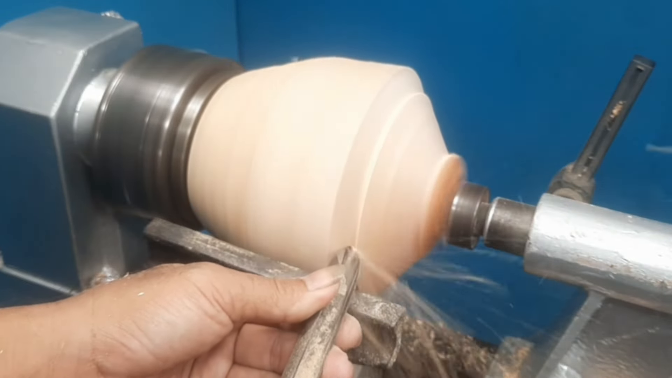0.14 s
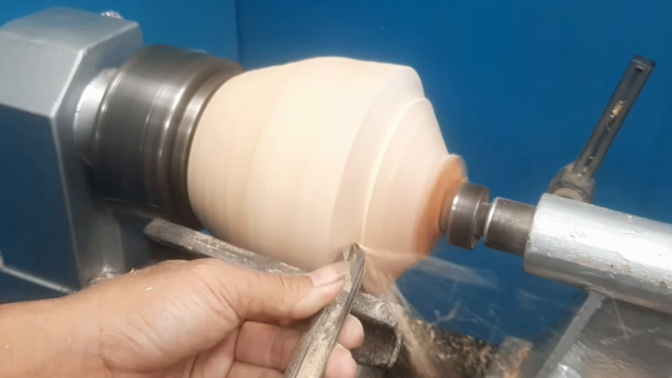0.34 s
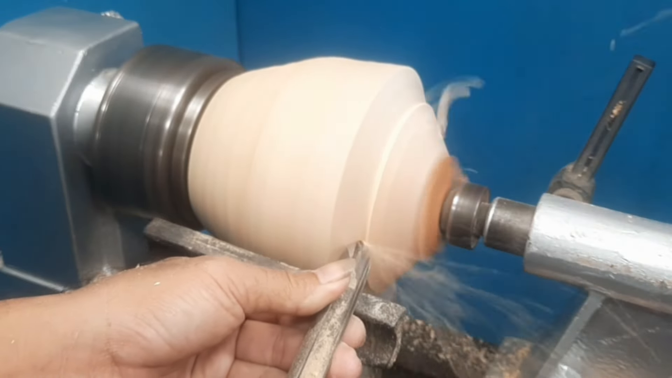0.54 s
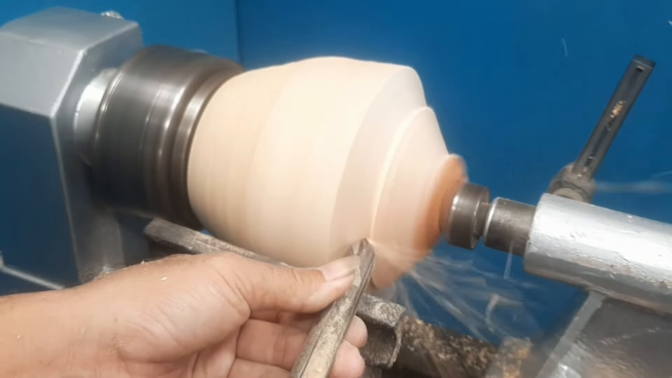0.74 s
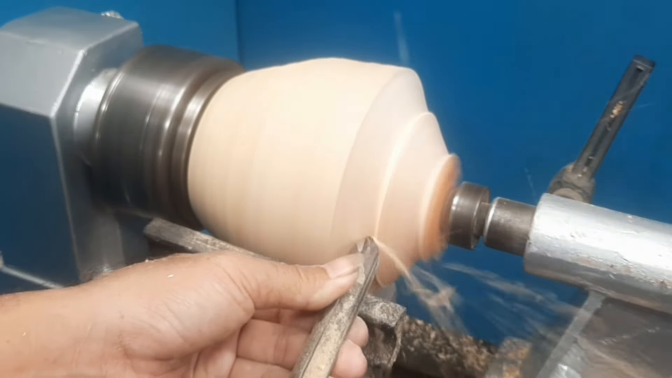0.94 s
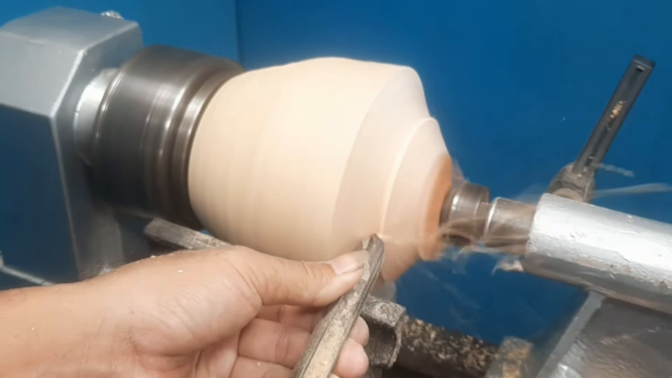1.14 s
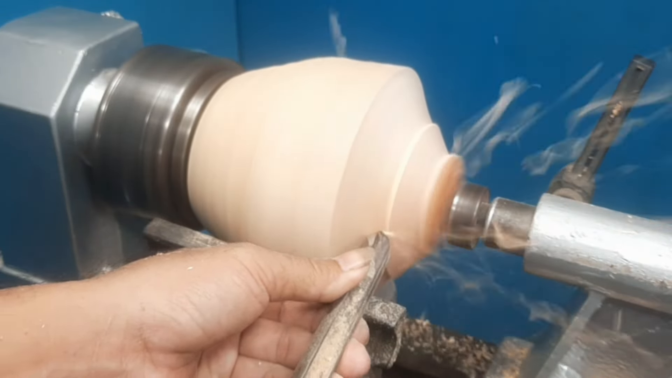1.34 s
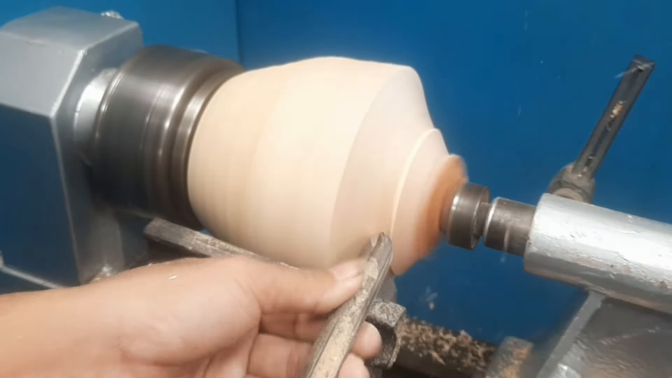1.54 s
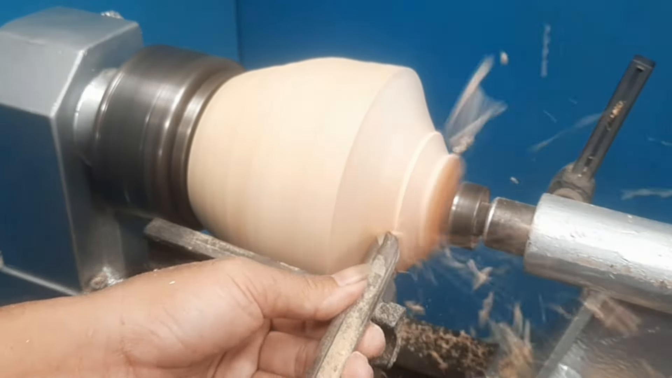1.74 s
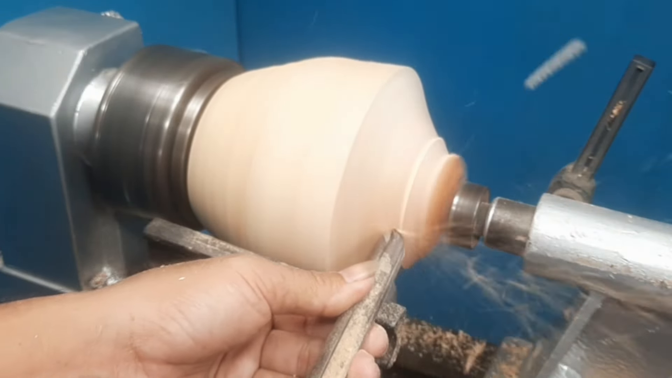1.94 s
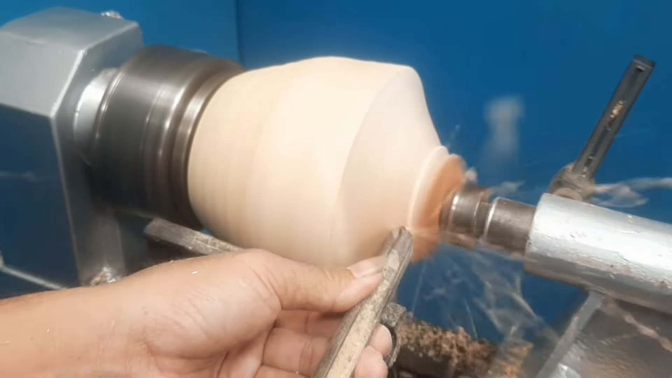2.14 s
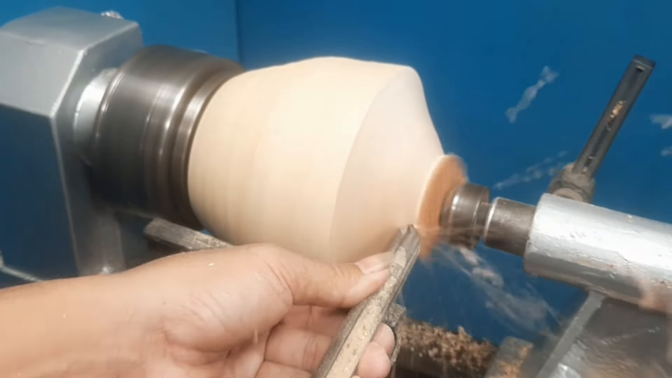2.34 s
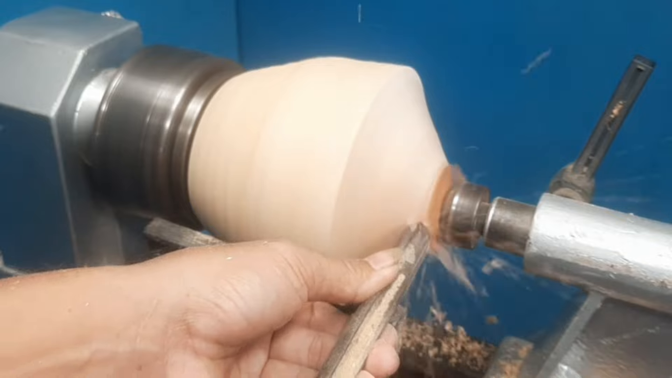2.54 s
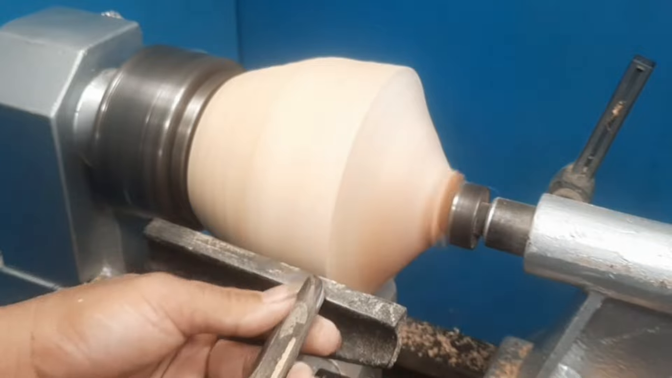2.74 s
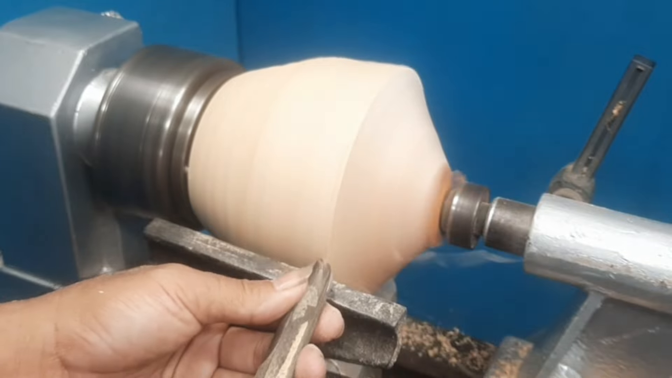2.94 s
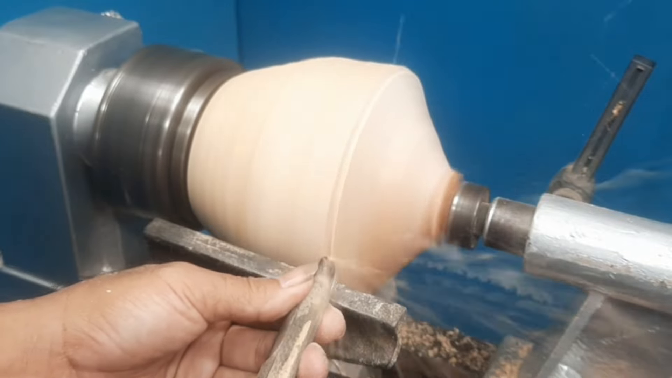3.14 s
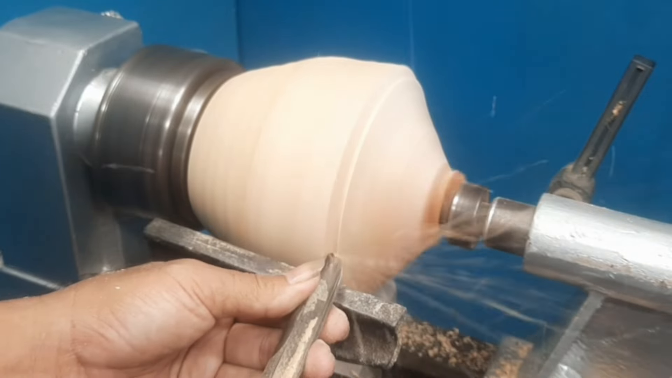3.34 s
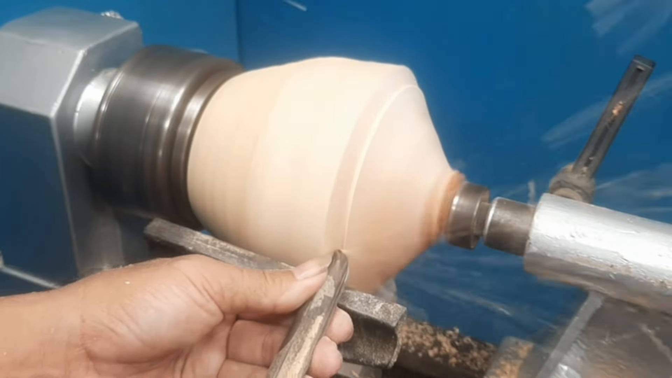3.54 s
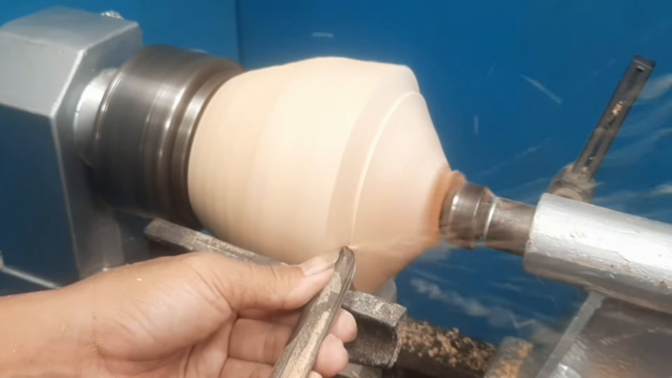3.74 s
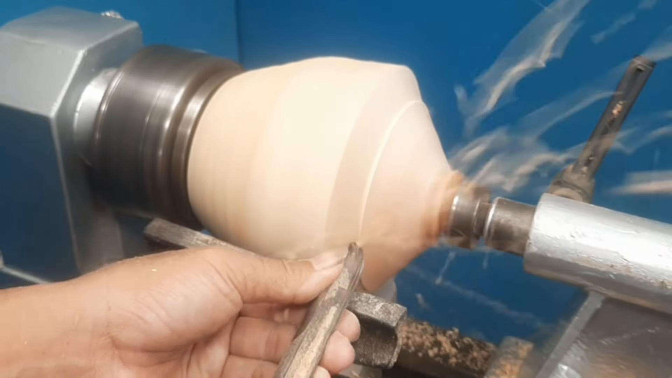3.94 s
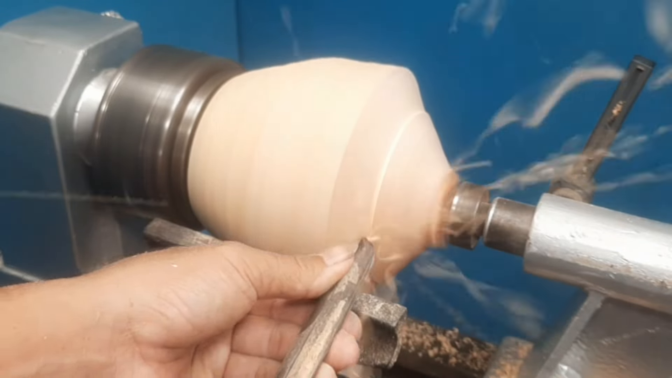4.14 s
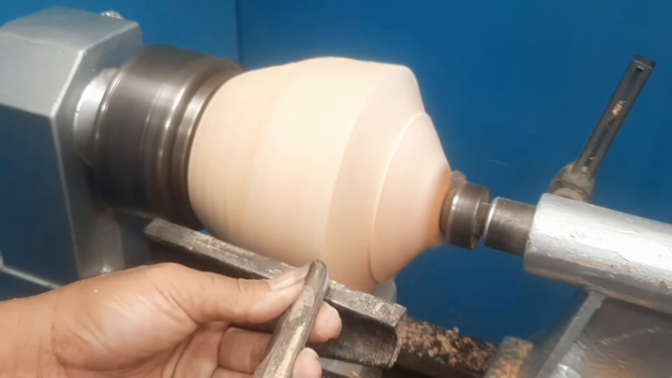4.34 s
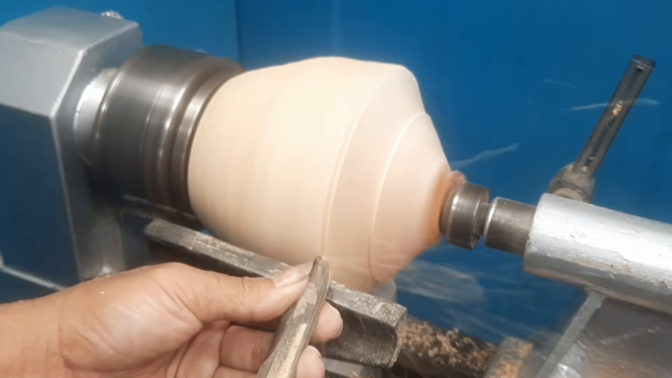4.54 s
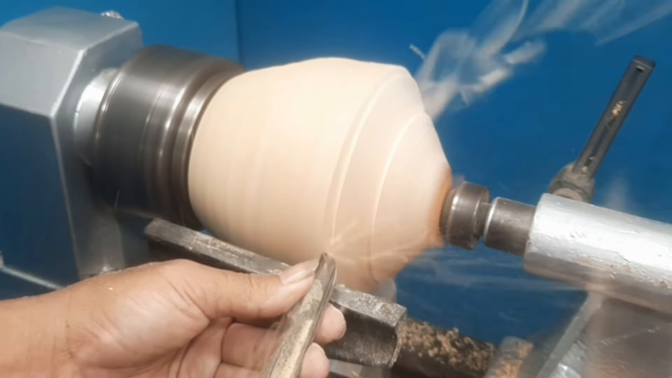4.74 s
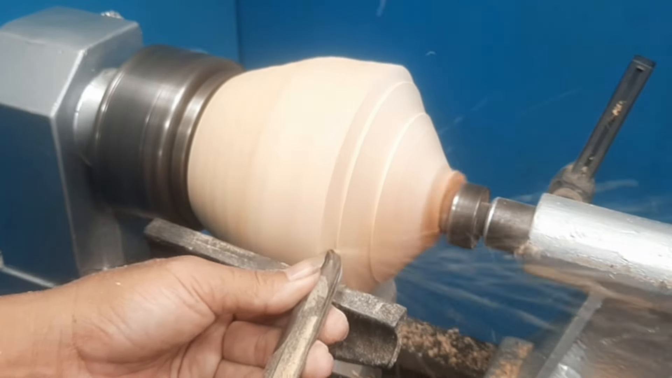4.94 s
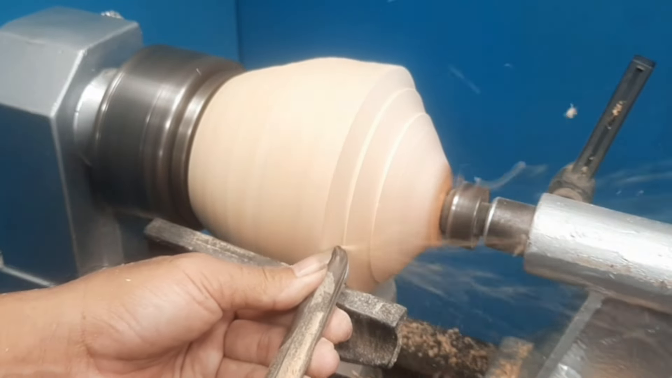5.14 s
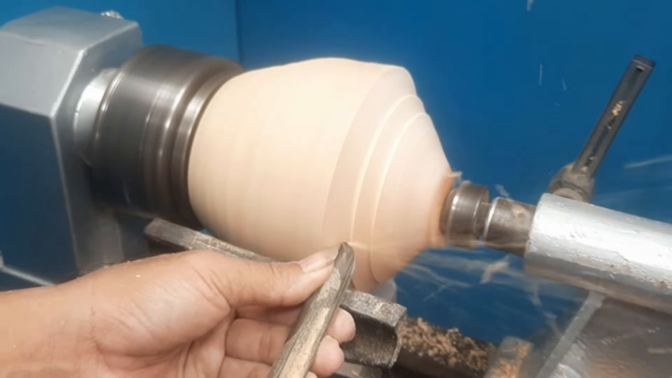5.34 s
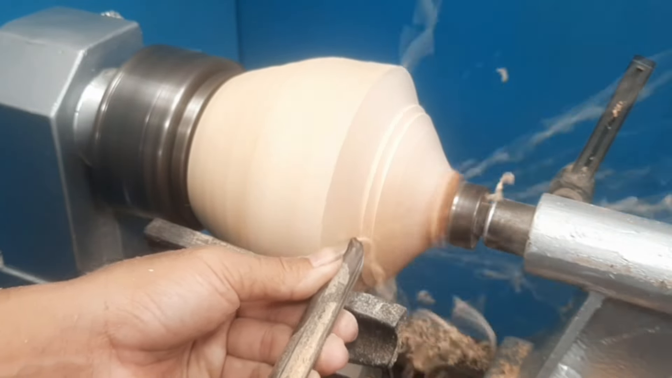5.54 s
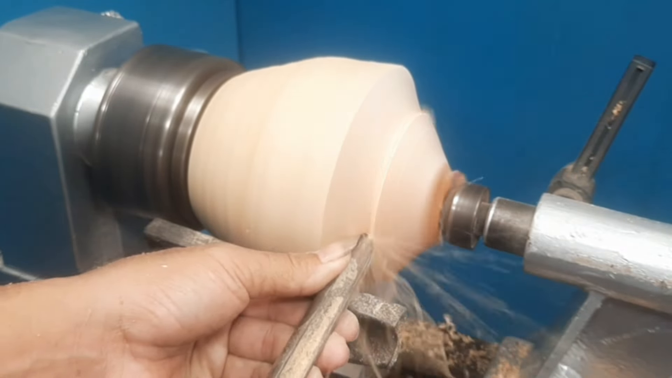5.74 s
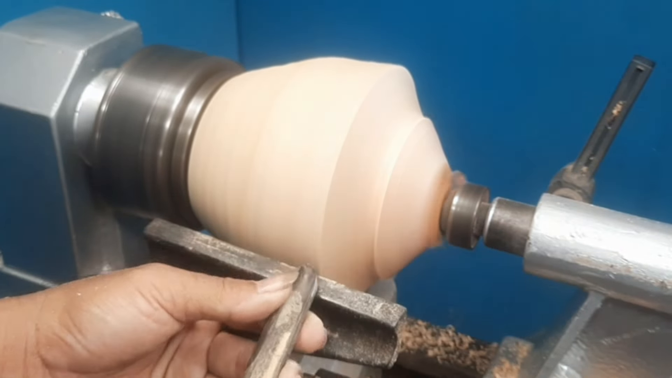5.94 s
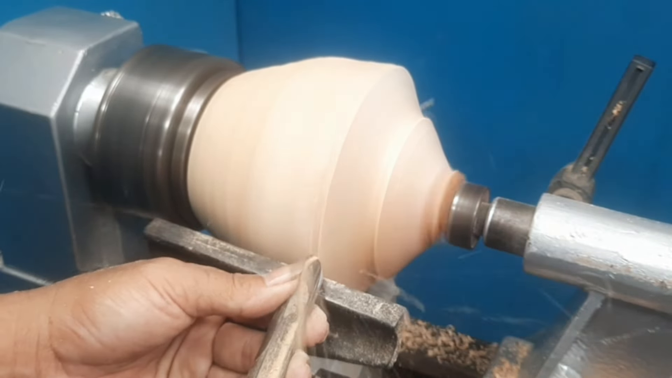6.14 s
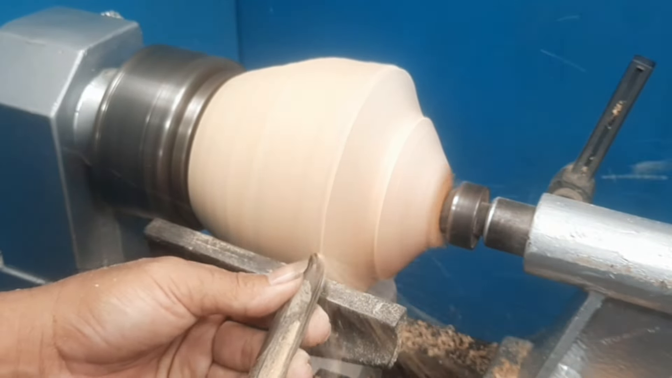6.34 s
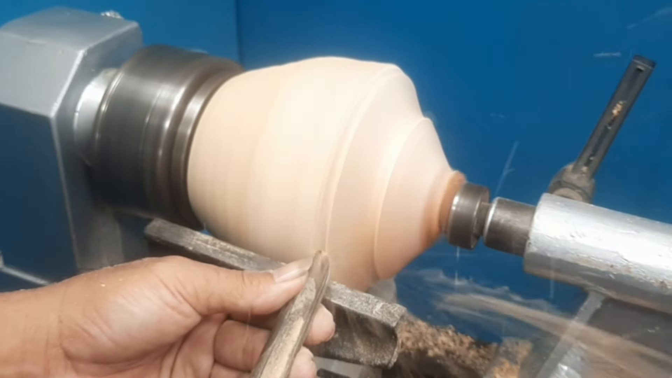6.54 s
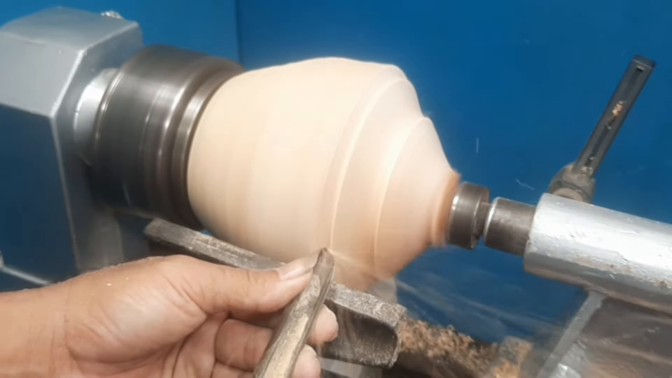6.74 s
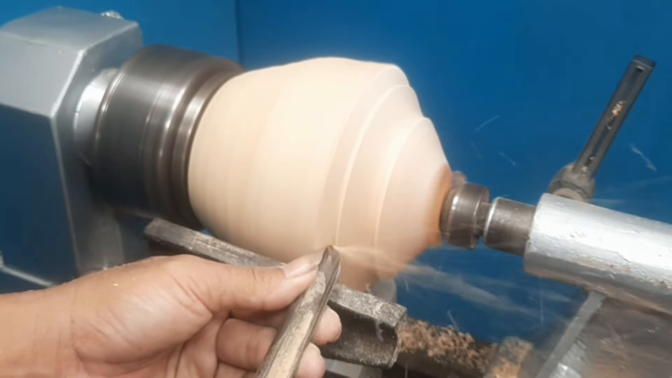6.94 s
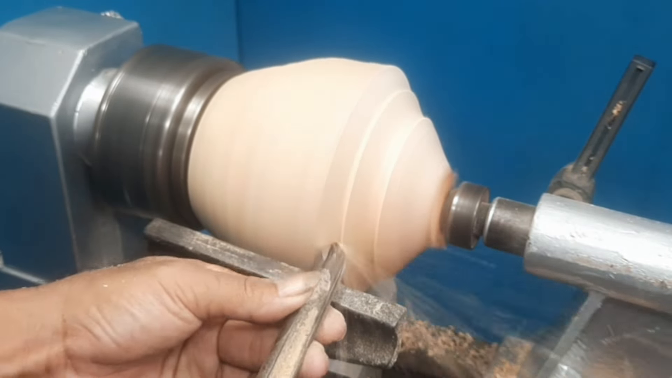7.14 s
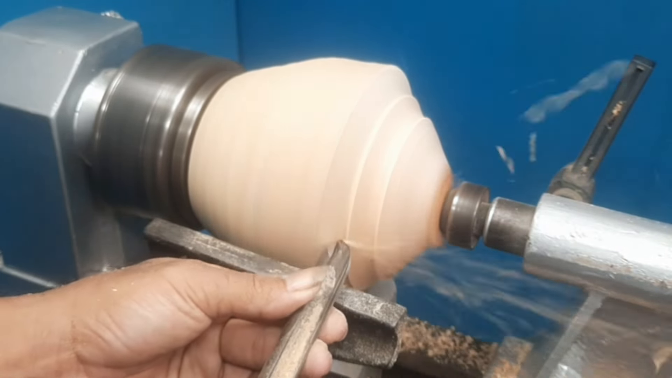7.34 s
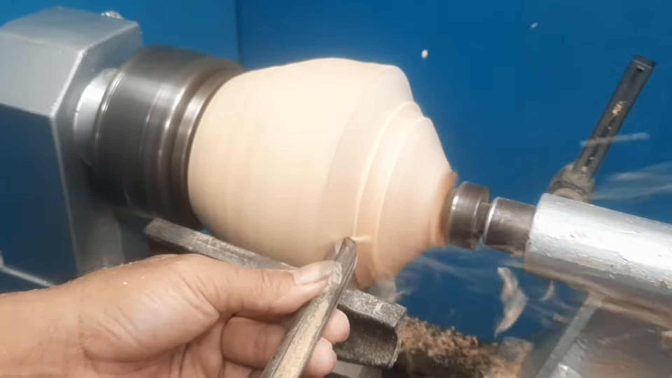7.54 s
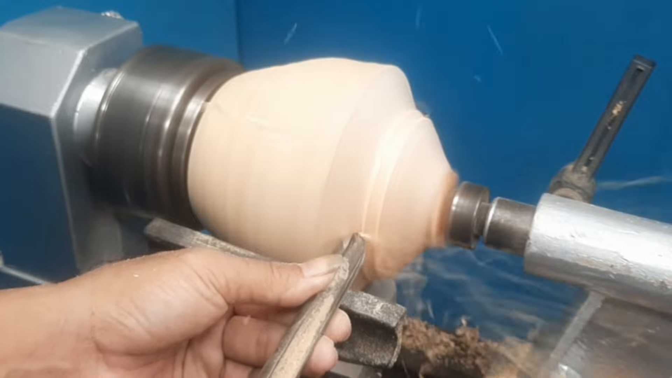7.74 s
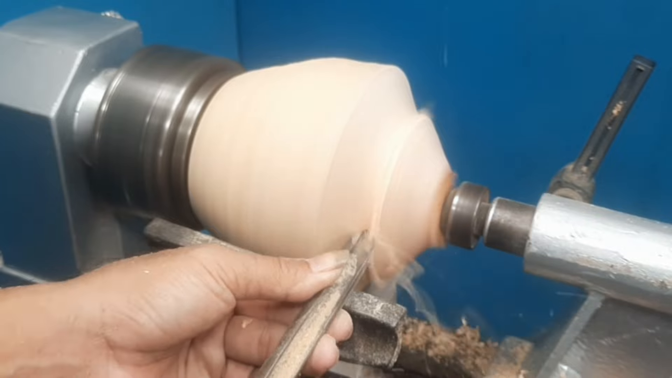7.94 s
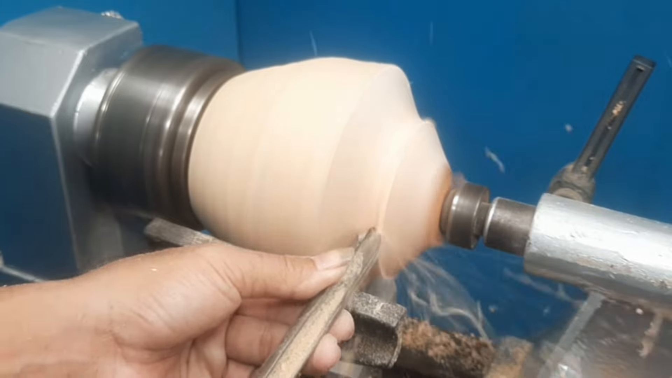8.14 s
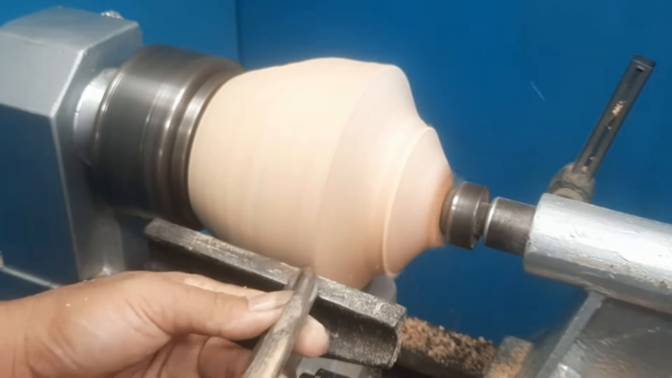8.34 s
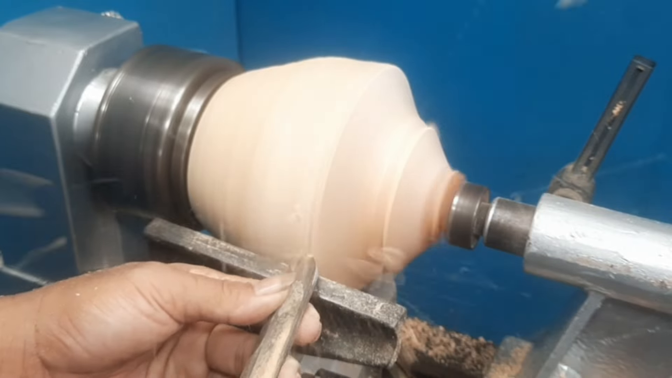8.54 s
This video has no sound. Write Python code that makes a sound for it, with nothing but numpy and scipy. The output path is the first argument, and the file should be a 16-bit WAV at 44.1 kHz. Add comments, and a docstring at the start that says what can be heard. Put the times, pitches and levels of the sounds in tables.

```python
"""At a wood lathe: a hand-held gouge takes five passes, and starts a sixth, over a spinning blank,
close to a two-port microphone. The edge tears fibres (hiss in the tool's high modes) and shakes
blank, tool, rest and headstock, each ringing in its own band (filtered noise). Between passes only
skips, ticks, a faint hover hiss, the lathe (rumbling and stirring the parts) and low puffs remain."""
import sys
import numpy as np
from scipy import signal
from scipy.fft import rfft, irfft, next_fast_len
from scipy.io import wavfile
from scipy.ndimage import uniform_filter1d

SR = 44100
rng = np.random.default_rng(int(sys.argv[2]) if len(sys.argv) > 2 else 0)


def int16_out(signal):
    """Quantize to a 16-bit WAV file."""
    q = np.round(np.clip(np.atleast_2d(signal).T, -1, 1) * 32767)
    wavfile.write(sys.argv[1], SR, q.astype(np.int16))


N = 383229
T = np.arange(N) / SR
M = next_fast_len(N)
HZ = np.fft.rfftfreq(M, 1 / SR)


def gain_of(db):
    """Turn decibels into an amplitude factor."""
    return 10 ** (np.asarray(db) / 20)


def evened(x):
    """Bring each channel to an RMS of one."""
    return x / np.sqrt(np.mean(x ** 2, -1, keepdims=True) + 1e-20)


def read(points, hz):
    """Read a curve of (frequency, value) along a logarithmic frequency axis."""
    f, value = np.transpose(points)
    return np.interp(np.log(hz + 1), np.log(f + 1), value)


def coloured(x, db):
    """Filter by a spectrum in dB, then even the level."""
    return evened(irfft(rfft(x, M) * gain_of(db), M)[:, :N])


def flutter(seconds):
    """Smooth chance that changes about once in the given time."""
    size = max(round(seconds * SR), 1)
    once = uniform_filter1d(rng.standard_normal(N), size)
    return evened(uniform_filter1d(once, size))


def drifting(x, patchy_db, hz, seconds):
    """The colour wanders in patches of time and frequency as the edge moves and turns."""
    z = signal.stft(x, nperseg=512)[2]
    bins, frames = round(hz * 512 / SR), round(seconds * SR / 256)
    patches = rng.standard_normal(z.shape[1:])
    for _ in range(2):
        patches = uniform_filter1d(patches, bins, axis=0)
        patches = uniform_filter1d(patches, frames, axis=1)
    patched = z * gain_of(patchy_db * patches / patches.std())
    return evened(signal.istft(patched, nperseg=512)[1][:, :N])


def slid(spectrum, shift_hz):
    """Back to time with every frequency moved by a curve in Hz."""
    turning = np.exp(2j * np.pi * np.cumsum(shift_hz) / SR)
    return (np.fft.ifft(spectrum, M)[:, :N] * turning).real


# colour of the running lathe: (frequency [Hz], relative level per Hz [dB])
LATHE_COLOUR = [(15, -4), (40, -5.5), (105, 2), (200, -6), (500, -15.5), (750, 1.5), (950, -11), (1150, -6),
                (1600, -9.5), (2100, -13), (3500, -19.5), (6000, -27), (12000, -30), (22000, -61)]
LATHE_DB = -33  # mid level at the source; it wavers


def lathe():
    """Motor, belt and bearings rumble without a break: coloured noise with a wavering level."""
    rumble = coloured(rng.standard_normal((2, N)), read(LATHE_COLOUR, HZ))
    return gain_of(LATHE_DB + 1.3 * flutter(0.03)) * rumble


# louder thumps of thrown air and shavings: (time [s], level before the port balance [dB], pitch [Hz])
LOUD_PUFFS = [(0.925, -21, 141), (1.056, -22, 170), (1.67, -15, 100), (1.973, -21, 300), (2.363, -22, 99.6),
              (2.471, -12, 248), (2.508, -9, 230), (2.524, -14, 220), (2.552, -14, 240), (2.569, -10, 224),
              (2.653, -14, 252), (2.787, -26, 110), (3.038, -24, 102), (3.579, -28, 90), (4.538, -20, 116),
              (4.6, -21, 150), (4.635, -21, 104), (4.758, -18, 180), (4.989, -24, 95), (5.221, -25, 128),
              (5.464, -22, 131), (5.664, -27, 90), (5.734, -21, 124), (5.985, -21, 91), (6.12, -14, 116),
              (6.217, -26, 156), (6.344, -21, 118), (6.476, -22, 131), (6.722, -26, 102), (7.17, -22, 126),
              (7.433, -18, 177), (8.057, -23, 120), (8.13, -16, 233), (8.295, -32, 85), (8.546, -21, 95),
              (8.569, -21, 110), (8.598, -23, 128), (8.654, -23, 109)]
SMALL_PUFFS = 60  # scattered at random
SMALL_DB, SMALL_SPREAD_DB = -35, 2.5  # mid level before the port balance, and its spread
SMALL_HZ, SMALL_SPREAD = 120, 0.16  # mid pitch, and its spread in natural-log units


def puffs():
    """A thump is a low swing of about two cycles, stronger left; its shape differs more the lower it is."""
    out = np.zeros((2, N + SR))
    t = np.arange(0, .06, 1 / SR) - .018  # the swing builds before its crest
    size, pitch = rng.standard_normal((SMALL_PUFFS, 2)).T
    small_db = SMALL_DB + SMALL_SPREAD_DB * size
    small_hz = SMALL_HZ * np.exp(SMALL_SPREAD * pitch)
    small = zip(rng.uniform(0, N / SR, SMALL_PUFFS), small_db, small_hz)
    for at, level_db, hz in LOUD_PUFFS + list(small):
        phase = rng.random()
        right_turn = rng.normal(0, 0.61) * min(100 / hz, 1) ** 2  # in cycles
        swing = np.cos(2 * np.pi * (hz * t + phase + np.array([[0], [right_turn]])))
        fall_cycles = rng.uniform(0.52, 0.72)
        swell = np.exp(-abs(t * hz / np.where(t < 0, .6, fall_cycles)))
        out[:, round(at * SR):][:, :len(t)] += gain_of(level_db) * swing * swell
    return out[:, :N] * gain_of([[3.5], [-3]])


# marked catches and brief slackenings of the edge in the grain:
# (time [s], change of the shaking [dB], negative is a drop)
GRAIN_CHANGES = [(0.381, 5), (0.398, 7), (0.453, 7), (0.49, 7), (0.522, 8), (0.594, 8), (0.697, -5),
                 (0.776, 8), (0.79, 12.5), (0.843, 5), (0.925, 1), (1.169, 11), (1.22, 9.5), (1.26, 10),
                 (1.313, 0), (1.359, 14), (1.363, 8), (1.495, 5), (1.524, 8.5), (1.562, -1), (1.748, 7),
                 (1.801, 10), (1.833, 11), (1.887, -3), (1.998, -2), (2.062, 5), (2.239, 12.5), (2.352, -2),
                 (2.415, 6), (3.55, -5), (3.624, 6), (3.904, 9), (4.027, 8), (4.107, 5), (4.175, -7),
                 (4.925, -1), (5.063, 1), (5.361, 5), (5.54, 4), (5.593, 4), (5.615, 2), (5.64, -3),
                 (5.732, 1), (6.477, 11), (7.06, 9), (7.315, 5), (7.573, 9), (7.694, 8.5), (7.712, 6),
                 (7.773, 8), (7.813, 1), (7.938, 9), (8.148, 5), (8.217, 4), (8.232, 12), (8.268, 13),
                 (8.32, 1)]
CHANGE_RISE_S, CHANGE_FALL_S = 0.0011, 0.0019  # from 1/e to the peak, and back
SMALL_CATCHES, SMALL_CATCH_DB = 420, 2.06  # count; exponential scale of their jolt, capped at twice it


def grip_changes():
    """The edge catches or slackens in the grain: brief rises and drops in dB, plus many small random rises."""
    small_at = rng.uniform(.02, N / SR - .02, SMALL_CATCHES)
    small_db = SMALL_CATCH_DB * np.minimum(rng.exponential(1, SMALL_CATCHES), 2)
    at, size = np.r_[GRAIN_CHANGES, np.c_[small_at, small_db]].T
    db = np.zeros(N)
    np.add.at(db, np.round(at * SR).astype(int), size)
    t = np.arange(-400, 401) / SR
    shape = np.exp(-(t / np.where(t < 0, CHANGE_RISE_S, CHANGE_FALL_S)) ** 2)
    return signal.oaconvolve(db, shape, "same")


# one curve per pass, from touch to lift: (time [s], scrape level [dB], depth of cut [0-1],
# lean of the ringing to the gouge's upper bands [0-1], headstock hum [dB], extra squeal [dB])
PASS_CURVES = [
    [(0.0, -23.5, 0.42, 0.52, -30, 2), (0.11, -24, 0.45, 0.68, -27.5, -5), (0.2, -26, 0.55, 0.65, -23, -5),
     (0.3, -23, 0.44, 0.69, -36, -5), (0.39, -21.5, 0.47, 0.62, -20.5, 0),
     (0.49, -23.5, 0.57, 0.67, -25, -6), (0.65, -25, 0.6, 0.74, -33.5, -1),
     (0.85, -24.5, 0.71, 0.68, -29, -4), (0.95, -24.5, 0.74, 0.57, -32.5, -1.5),
     (1.11, -24, 0.72, 0.58, -32.5, 3), (1.27, -25, 0.85, 0.54, -29, -1),
     (1.33, -25.5, 0.88, 0.61, -31.5, 1), (1.53, -25, 0.82, 0.63, -39, 4), (1.585, -26, 0.81, 0.6, -33, 4)],
    [(1.705, -28, 0.84, 0.47, -43, 4), (1.76, -22.5, 0.67, 0.5, -45, 6), (1.8, -22.5, 0.72, 0.56, -42, 3),
     (1.94, -23.5, 0.71, 0.46, -37, 6.5), (2.16, -23, 0.85, 0.51, -33.5, 4.5),
     (2.36, -17.5, 0.88, 0.38, -30, 2), (2.4, -22.5, 0.85, 0.36, -33, 8.5),
     (2.46, -19.5, 0.71, 0.1, -24, 2.5), (2.55, -25.5, 0.75, 0.0, -33, 3), (2.64, -27, 0.88, 0.1, -24.5, 3),
     (2.68, -27, 0.89, 0.1, -27, -4.5), (2.722, -40, 0.74, 0.0, -30, 2)],
    [(3.017, -16.5, 0.0, 0.15, -35, 6), (3.06, -20.5, 0.12, 0.1, -40, 6), (3.12, -21, 0.34, 0.13, -35, -1),
     (3.24, -17.5, 0.2, 0.24, -27.5, 4), (3.3, -20.5, 0.2, 0.2, -27.5, 3),
     (3.45, -17, 0.18, 0.28, -25.5, 5), (3.62, -21.5, 0.13, 0.56, -35, 8.5),
     (3.72, -22, 0.06, 0.55, -26, 8.5), (3.8, -21, 0.18, 0.66, -36, 4), (3.95, -21.5, 0.23, 0.78, -42, 4),
     (4.11, -25, 0.42, 0.92, -43, 4.5), (4.22, -24, 0.52, 0.83, -40, 7), (4.255, -23.5, 0.57, 0.7, -37, 2)],
    [(4.473, -22.5, 0.01, 0.33, -53, -2), (4.58, -18, 0.08, 0.3, -41, 4),
     (4.68, -17.5, 0.1, 0.33, -27.5, 7), (4.9, -19, 0.19, 0.44, -28, 6.5), (5.1, -20, 0.35, 0.56, -25, 1.5),
     (5.36, -23.0, 0.41, 0.74, -31, 1.5), (5.54, -22, 0.53, 0.78, -29, 5), (5.6, -23.5, 0.57, 0.83, -30, 3),
     (5.66, -25, 0.79, 0.8, -35, -1), (5.76, -23.5, 0.72, 0.62, -21.5, -4), (5.84, -23, 0.9, 0.51, -37, -6),
     (5.92, -28, 0.89, 0.53, -37, 10)],
    [(6.168, -20, 0.0, 0.2, -51, -7), (6.19, -20, 0.0, 0.07, -50, -4.5), (6.24, -22.5, 0.3, 0, -30.5, -9),
     (6.3, -21.5, 0.2, 0.12, -38, -4), (6.42, -19.5, 0.18, 0.34, -26.5, 3.5),
     (6.65, -18.5, 0.2, 0.37, -29.5, 2), (6.92, -21, 0.35, 0.54, -25.5, -5),
     (7.06, -21, 0.44, 0.56, -26.5, -9), (7.12, -23, 0.3, 0.59, -25.5, 4.0),
     (7.26, -23, 0.42, 0.57, -33, -3), (7.4, -22.5, 0.48, 0.68, -32, 2.5),
     (7.54, -22.5, 0.58, 0.63, -30.5, 4), (7.67, -24, 0.7, 0.79, -27, 3),
     (7.77, -24.5, 0.88, 0.61, -30.5, -6), (7.95, -24.5, 0.85, 0.46, -30.5, -5),
     (8.12, -23.5, 0.82, 0.53, -30.5, 4.5), (8.25, -26, 0.92, 0.47, -25.5, -2),
     (8.3, -23.5, 1, 0.4, -37, 5), (8.335, -25.5, 0.9, 0.54, -36, 2)],
    [(8.59, -23, 0, 0.28, -44, -13), (8.69, -19, 0.03, 0.14, -28, -9)],
]
TOUCH_DB_PER_S, LIFT_DB_PER_S = 1400, 1098  # how fast the edge bites and lets go
# the hand eases off, or bears down where positive: (time [s], level change [dB], half-length to 1/e [s])
HAND_EASING = [(0.064, -1, 0.02), (2.31, -7.5, 0.057), (2.596, 2, 0.02), (2.654, -5.5, 0.039),
               (3.495, -9, 0.023), (4.537, -5, 0.069), (5.79, -4.5, 0.052), (7.056, -5.5, 0.013),
               (8.304, -8.5, 0.0072)]
# the edge skips on high spots, mostly coming in or leaving, sometimes mid-pass:
# (time [s], level, played 1.5 dB lower [dB])
EDGE_SKIPS = [(1.672, -27), (1.683, -30), (1.703, -30), (2.276, -19.5), (2.533, -15.5), (2.616, -15.5),
              (2.646, -25), (2.692, -20.5), (2.705, -18), (2.718, -25), (2.975, -18), (2.983, -21.5),
              (2.989, -19), (3.014, -25), (3.491, -18), (4.2078, -22), (4.3924, -36), (4.417, -32),
              (4.452, -29), (4.464, -24), (4.487, -19), (4.52, -23), (6.075, -16.5), (6.087, -23),
              (6.1, -28), (6.116, -33), (6.132, -23), (6.146, -20), (6.157, -17), (6.171, -19),
              (6.1824, -14), (6.1974, -18), (6.21, -25), (8.572, -26), (8.584, -24), (8.607, -16)]
SKIP_S = 0.0064  # length above half amplitude
# loose chips strike the tool: (time [s], level [dB])
CHIP_TICKS = [(4.2715, -33), (4.2975, -33)]
TICK_S = 0.00073  # half-length of the power to 1/e
HOVER_DB = -57  # faint hiss while the edge hovers off the wood


def edge():
    """The hand's controls over time: scrape gain, contact gain, depth, lean, headstock hum and squeal."""
    s, *columns = np.transpose(sum(PASS_CURVES, []))
    scrape_db, depth, lean, hum_db, squeal_db = (np.interp(T, s, c) for c in columns)
    away_db = []
    for curve in PASS_CURVES:
        before_db = TOUCH_DB_PER_S * (curve[0][0] - T)
        after_db = LIFT_DB_PER_S * (T - curve[-1][0])
        away_db.append(np.maximum(before_db, after_db))
    touch = gain_of(-np.clip(np.min(away_db, axis=0), 0, 99))
    eased_db = sum(change_db * np.exp(-((T - at) / length) ** 2) for at, change_db, length in HAND_EASING)
    contact = touch * gain_of(eased_db)
    power = (contact * gain_of(scrape_db)) ** 2 + gain_of(HOVER_DB) ** 2
    for at, tick_db in CHIP_TICKS:
        power += gain_of(tick_db) ** 2 * np.exp(-((T - at) / TICK_S) ** 2)
    u = np.arange(0, 8, 1.68 / (SKIP_S * SR))
    skip = (u * np.exp(1 - u)) ** 2  # soft rise, slower fall
    for at, skip_db in EDGE_SKIPS:
        part = power[round(at * SR):][:len(u)]
        part += (gain_of(skip_db - 1.5) * skip)[:len(part)] ** 2
    # depth and lean fade more slowly than the contact
    return np.sqrt(power), contact, touch ** 0.21 * depth, touch ** 0.26 * lean, hum_db, squeal_db


# shaking of each part: (level over the scrape [dB], change per depth [dB], change per lean [dB],
# constant idle level [dB]); the headstock takes only its idle level from here
PART_SHAKING = [(-20, 16.5, -18, -54), (0, 0, 0, -42), (-21, 18, -3.5, -46), (-35, 36, 2.5, -55),
                (-24, 21.5, 6, -62), (-39, 21.5, 30, -74), (-33.5, 6.5, 39, -70), (-19, -9, 27, -65)]
# the tool rest judders as a pass deepens: (time [s], length [s], start at the rest [dB], at the blank [dB])
REST_JUDDERS = [(0.497, 0.39, -36, -32.5), (.8, .3, -37, -30.5), (1.035, 0.32, -32, -27.5),
                (2.462, 0.268, -22.5, -26.5), (2.607, 0.15, -35, -36), (8.102, 0.12, -29, -26)]
JUDDER_RISE_S, JUDDER_FADE_DB_PER_S = 0.02, -32
WANDER_DB, WANDER_S = 1.53, 0.021  # each part's shaking comes and goes by chance
RING_ON_DB, RING_ON_T60_S = -13.5, .16  # parts and bench ring on after the edge lifts
REST, HEADSTOCK, BLANK, SQUEALING = 0, 1, 2, 4  # places among the parts; the last is a gouge band


def shaking_gains(hand):
    """Depth and lean set how hard each part shakes; the headstock hums apart; a faint idle never stops."""
    gain, contact, depth, lean, hum_db, squeal_db = hand
    cutting = []
    for over_db, depth_db, lean_db, _ in PART_SHAKING:
        level_db = over_db + depth_db * depth + lean_db * lean + WANDER_DB * flutter(WANDER_S)
        cutting.append(gain * gain_of(level_db))
    cutting[HEADSTOCK] = contact * gain_of(hum_db)
    cutting[SQUEALING] = cutting[SQUEALING] * gain_of(squeal_db)
    for at, length, rest_db, blank_db in REST_JUDDERS:
        ramp = np.clip(np.minimum(T - at, at + length - T) / JUDDER_RISE_S, 0, 1)
        swell = ramp * gain_of(JUDDER_FADE_DB_PER_S * np.clip(T - at, 0, length))
        cutting[REST] = np.hypot(cutting[REST], swell * gain_of(rest_db))
        cutting[BLANK] = np.hypot(cutting[BLANK], swell * gain_of(blank_db))
    keep = gain_of(-2 * 60 / (RING_ON_T60_S * SR))  # doubled because it acts on power
    tails = gain_of(2 * RING_ON_DB) * signal.lfilter([1 - keep], [1, -keep], np.square(cutting))
    idle = [gain_of(2 * row[3]) for row in PART_SHAKING]
    return [np.sqrt(c ** 2 + tail + still) for c, tail, still in zip(cutting, tails, idle)]


CHIPS_PER_S, CHIP_SPREAD_DB, CHIP_SHARE = 1500, 4, .45  # single chips snapping off among the torn fibres


def tearing(quick_db, slow_db):
    """Fibres break in clumps and chips snap off: two strands under one uneven grip."""
    chip_gain = gain_of(CHIP_SPREAD_DB * np.minimum(rng.exponential(1, N), 3))
    chips = (rng.random(N) < CHIPS_PER_S / SR) * chip_gain
    fibres = evened(rng.standard_normal((2, N)))
    strands = fibres + CHIP_SHARE * evened(chips * rng.choice([-1., 1.], (2, N)))
    grip_db = quick_db * flutter(0.0012) + slow_db * flutter(0.02)
    return evened(strands * gain_of(grip_db))


# tool rest, headstock, blank, then five bands of the gouge (four slide in pitch, the highest stays
# nearly still); modes of each: (frequency [Hz], width [Hz], relative level [dB])
PART_MODES = [
    [(201.6, 102, -6), (279, 100, -5), (399.4, 78, -6)],
    [(649.8, 57, -8), (703.7, 43, -9), (761.3, 34.6, 1), (838.6, 34, -10.5)],
    [(1064, 200, -1.5), (1392, 334, -2)],
    [(1856, 300, -8.5), (2059, 114, 0.5), (2300, 320, -7.5)],
    [(3187, 86, -0.5), (3293, 116, -8), (2895, 430, -13.5)],
    [(3958, 123, 1.5), (3538, 225, -1), (3804, 180, -10.5)],
    [(4190, 170, -2), (4630, 410, -9)],
    [(5220, 1300, 2.5), (6030, 900, -6.5)],
]
# slide as the gouge's overhang and pressure change: (time [s], shift before each part's share [%])
PITCH_BEND = [(0, 1), (.65, 2.5), (1.0, 0.62), (1.35, 0), (1.9, 1), (2.25, -1.43), (2.7, -1), (3.05, -1.5),
              (3.6, .5), (4.1, 0.86), (4.55, -1.5), (5.0, -0.66), (5.5, 1.4), (5.9, 2.6), (6.2, 0),
              (7.0, 0), (7.5, 2.14), (8.3, 1.5), (8.6, 0.3)]
# how far each part follows that slide; rest, headstock, blank and highest band hardly do: (share [1 = fully])
BEND_SHARE = [0.0045, 0.011, 0.027, .9, 1.1, .4, .4, 0.0072]


def ringing(hand, change_db):
    """Each mode is a steep resonance shaken by the tearing; it rings on after each jolt."""
    bend = np.interp(T, *np.transpose(PITCH_BEND)) / 100
    fibres = drifting(tearing(quick_db=1.6, slow_db=.4), patchy_db=.7, hz=200, seconds=.08)
    shaking = rfft(fibres * gain_of(change_db), M)
    even = rfft(rng.standard_normal((2, N)), M)
    out = 0
    for k, (modes, gain) in enumerate(zip(PART_MODES, shaking_gains(hand))):
        peaks = np.array([gain_of(db) / (1 + 2j * (HZ - hz) / width) ** 2 for hz, width, db in modes])
        # modes blend without holes between them: magnitudes add, phase comes from the sum
        peaks = abs(peaks).sum(axis=0) * np.exp(1j * np.angle(peaks.sum(axis=0)))
        # the headstock is too massive to follow the quick tearing
        rung = (even if k == HEADSTOCK else shaking) * peaks
        if BEND_SHARE[k]:
            rung = slid(rung, BEND_SHARE[k] * bend * HZ[abs(peaks).argmax()])
        else:
            rung = irfft(rung, M)[:, :N]
        out = out + gain * evened(rung)
    return out


# colour of a light scrape: (frequency [Hz], relative level per Hz [dB])
LIGHT_COLOUR = [(200, -11), (500, -11.5), (1600, -46), (2600, -18), (3600, -15.5), (6000, -5.5), (8300, 8),
                (11000, 2), (14500, -3.5), (22000, -21)]
# colour of a deep cut: (frequency [Hz], relative level per Hz [dB])
DEEP_COLOUR = [(200, -2), (500, 3), (1600, -4), (2600, 3.5), (3600, 5), (6000, -2), (8300, 5),
               (11000, -6.5), (14500, -7.5), (22000, -34)]
# high modes of the gouge and the dips between them: (frequency [Hz], width [Hz],
# height over the hiss in a light scrape [dB], in a deep cut [dB])
GOUGE_MODES = [(3165, 135, 10, 9.5), (3830, 310, 17.5, 6.5), (5100, 380, 14, 9.5), (5370, 260, -6, 0.5),
               (5660, 290, 11, -6), (6930, 136, 10.5, 7.5), (7390, 170, 1, 10.5), (7710, 290, 9.5, -22),
               (8160, 830, -6, 4), (9080, 156, 8.5, 10.5), (10160, 370, 9, -2.5), (11550, 260, -6, 4.5),
               (12000, 340, 2, 13.5), (13140, 420, 5.5, 13)]
DEEP_AT_REST, DEEP_PER_DEPTH, DEEP_PER_LEAN = 0.017, 0.53, 0.48  # share of the deep-cut colour
CHANGE_IN_HISS = 0.28  # share of each catch or slackening, in dB, that reaches the hiss


def scrape(hand, change_db):
    """Torn fibres hiss through the gouge's high modes, blending from light to deep colour; skips burst."""
    gain, _, depth, lean, *_ = hand
    fibres = drifting(tearing(quick_db=1.0, slow_db=.5), patchy_db=1.5, hz=300, seconds=.12)
    shapes = np.array([1 / (1 + (2 * (HZ - hz) / width) ** 2) for hz, width, *_ in GOUGE_MODES])
    light_db, deep_db = np.array(GOUGE_MODES)[:, 2:].T @ shapes
    light_cut = coloured(fibres, read(LIGHT_COLOUR, HZ) + light_db)
    deep_cut = coloured(fibres, read(DEEP_COLOUR, HZ) + deep_db)
    deep = np.clip(DEEP_AT_REST + DEEP_PER_DEPTH * depth + DEEP_PER_LEAN * lean, 0, 1)
    hiss = (1 - deep) * light_cut + deep * deep_cut
    return gain * gain_of(CHANGE_IN_HISS * change_db) * hiss


# left-right likeness: (frequency [Hz], shared part [0-1])
PORT_LIKENESS = [(100, .1), (250, .85), (600, .85), (950, .4), (1200, .6), (2000, .65), (2600, .3),
                 (3200, .55), (4200, .65), (5500, .7), (6300, .4), (9000, .68), (11200, .4), (15000, .4)]
# balance, left over right: (frequency [Hz], gain difference [dB])
PORT_BALANCE = [(60, 9), (300, 4.5), (760, 5), (1100, 6), (1450, 2.5), (2050, 7.5), (2950, 1), (4300, 6),
                (5500, 3), (7300, 2), (9000, 0.5), (10200, 4), (11000, -2.5), (13200, 7), (14000, -4),
                (15500, 10)]
# the housing turns the phase at the right port further: (frequency [Hz], phase [rad])
HOUSING_TURN = [(0, 0), (250, .2), (550, .7), (850, 2), (1000, .3), (1400, 0), (2200, -3.2), (3200, -1.7),
                (3700, 1.2), (4000, 0), (5800, -.4), (6300, -3), (7300, 1.3), (8200, 5.1), (9200, 6.3),
                (10700, 8), (11100, 5.6), (13600, 8.3), (15200, 3.7)]
RIGHT_LAG_S = .00027


def ports(strands):
    """The right port hears part of the same sound, later and mostly weaker, and part by other paths."""
    near, other = rfft(strands, M)
    same = np.clip(read(PORT_LIKENESS, HZ), 0, 1)
    late = np.exp(1j * (read(HOUSING_TURN, HZ) - 2 * np.pi * HZ * RIGHT_LAG_S))
    right = same * near * late + np.sqrt(1 - same ** 2) * other
    balance = gain_of(read(PORT_BALANCE, HZ) / 2)  # half to each side
    return irfft([near * balance, right / balance], M)[:, :N]


def scene():
    """One hand drives scrape and ringing; with the lathe they pass the ports, and puffs join after."""
    hand, change_db = edge(), grip_changes()
    through_ports = lathe() + ringing(hand, change_db) + scrape(hand, change_db)
    return puffs() + ports(through_ports)


PORT_HZ, PORT_WIDTH_HZ, PORT_DB = 15450, 350, 9  # resonance of the microphone ports
BAND_LIMIT_HZ = 15520


def record(dry):
    """Port resonance, an input stage that rounds the highest peaks, then the band limit."""
    resonance_db = PORT_DB / (1 + (2 * (HZ - PORT_HZ) / PORT_WIDTH_HZ) ** 2)
    heard = irfft(rfft(dry, M) * gain_of(resonance_db), M)[:, :N]
    rounded = heard / (1 + heard ** 4) ** (1 / 4)
    low_pass = signal.firwin(1023, BAND_LIMIT_HZ, window=("kaiser", 8), fs=SR)
    return signal.oaconvolve(rounded, low_pass[None], "same")


dry = scene()
out = record(dry)
int16_out(out)
```